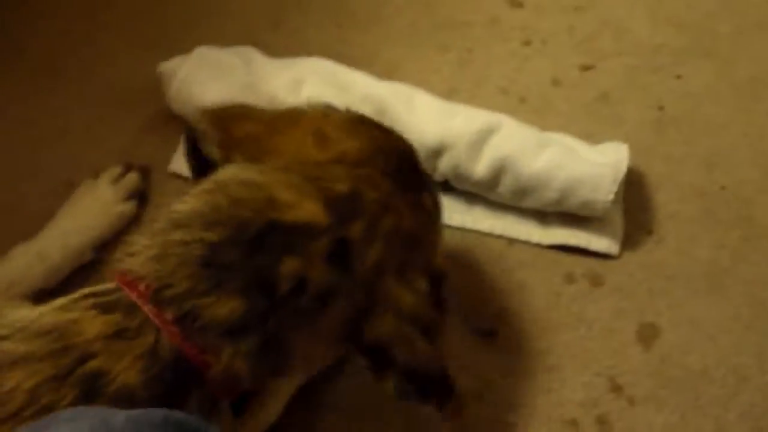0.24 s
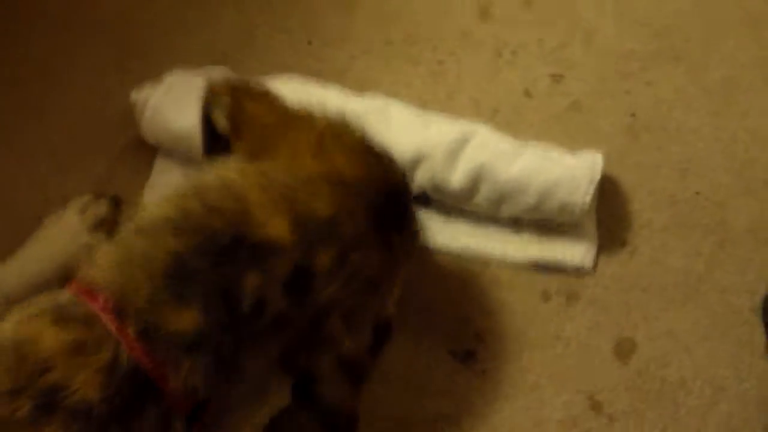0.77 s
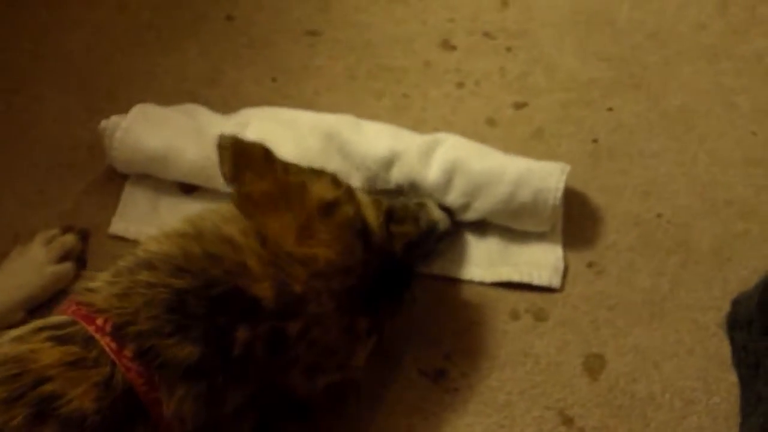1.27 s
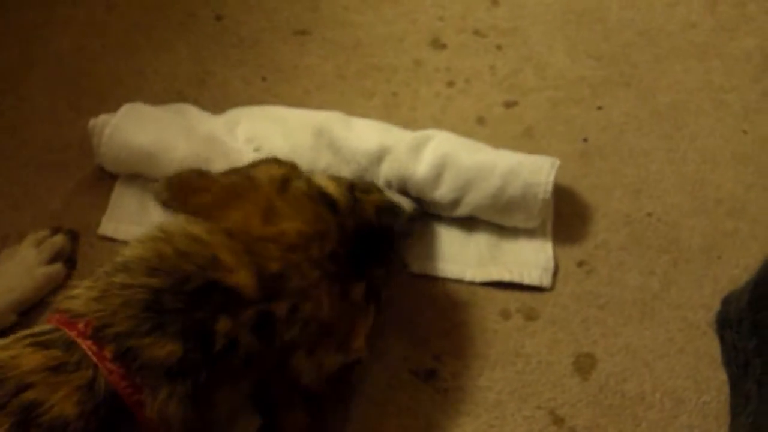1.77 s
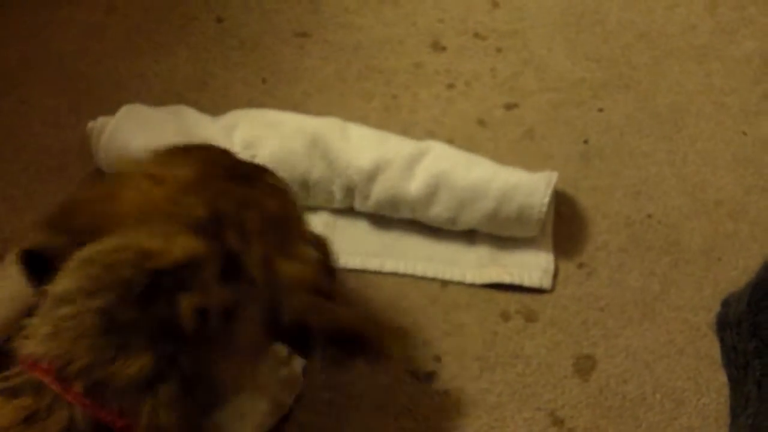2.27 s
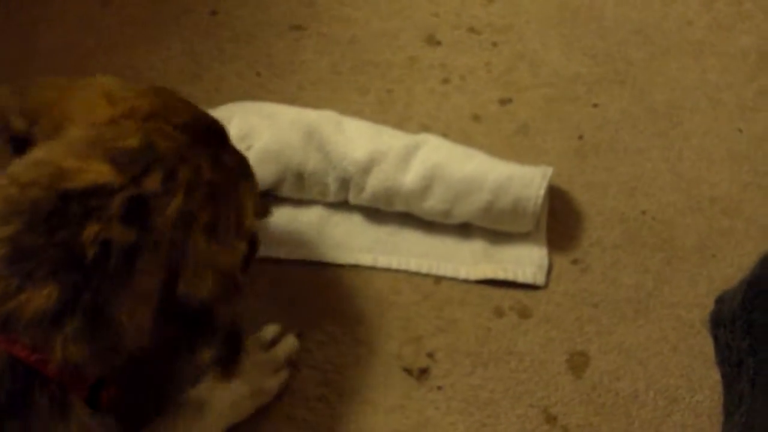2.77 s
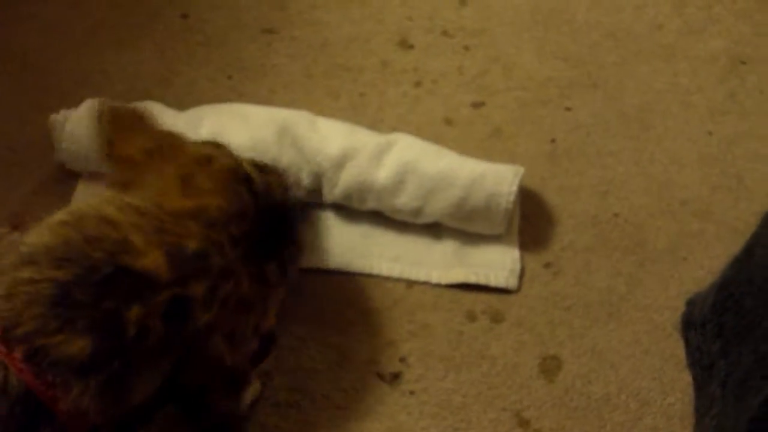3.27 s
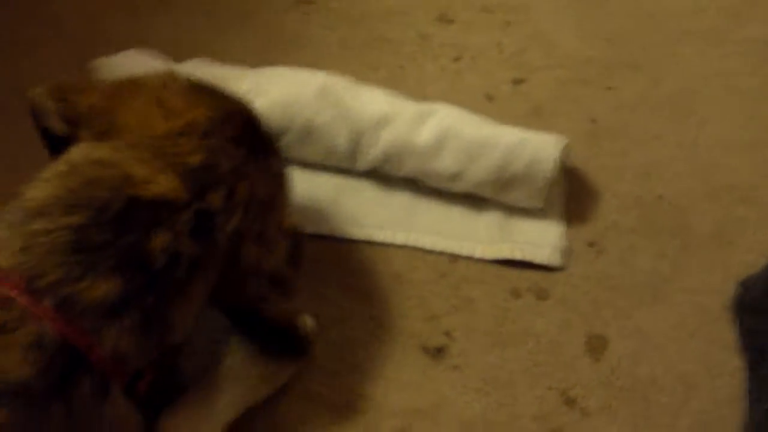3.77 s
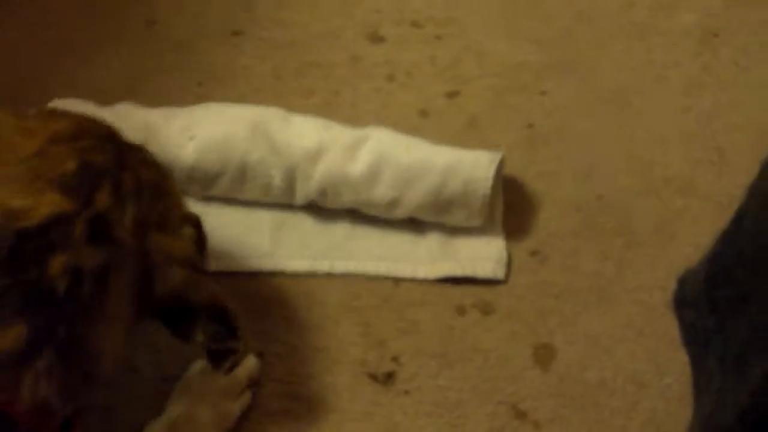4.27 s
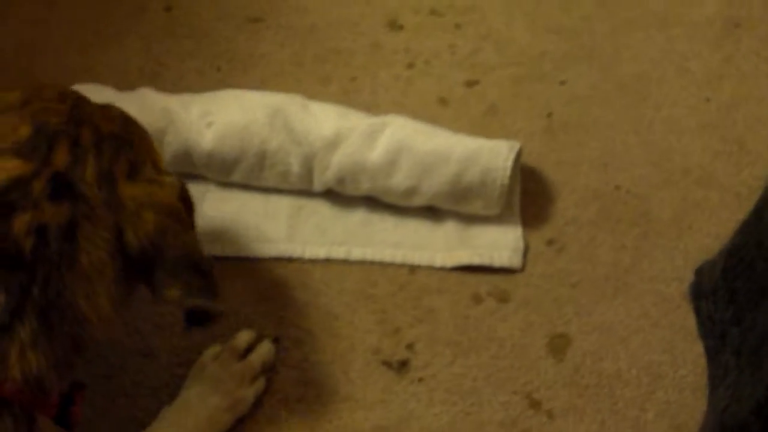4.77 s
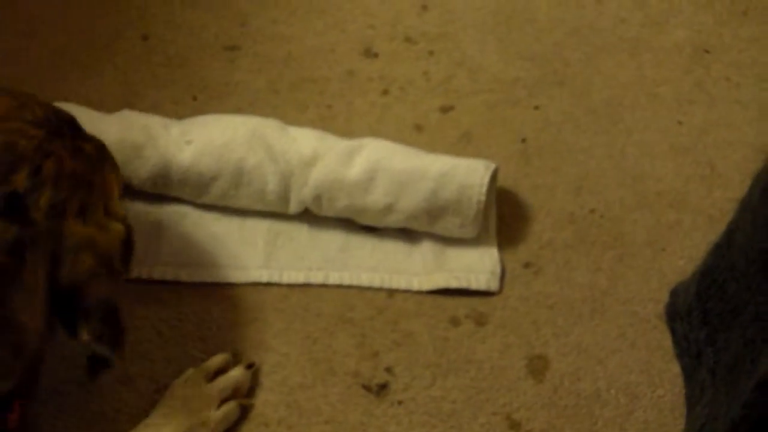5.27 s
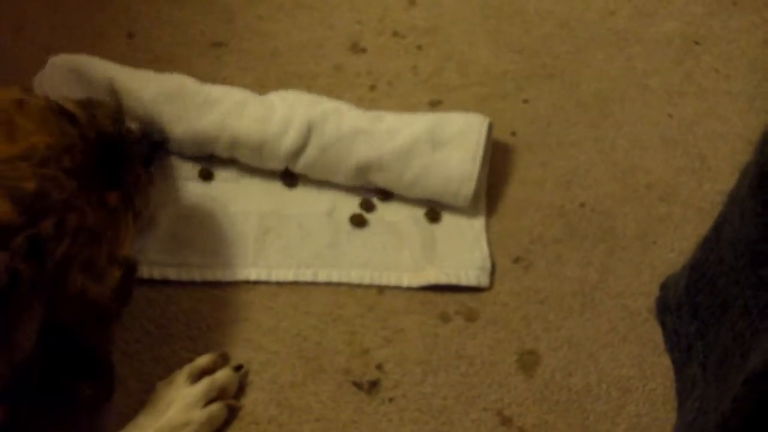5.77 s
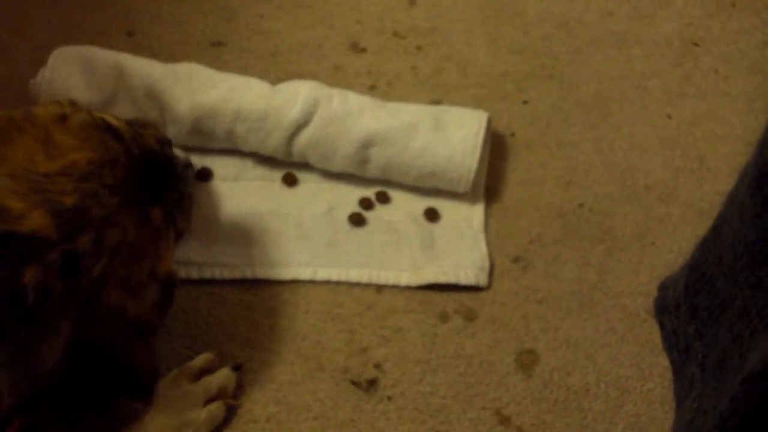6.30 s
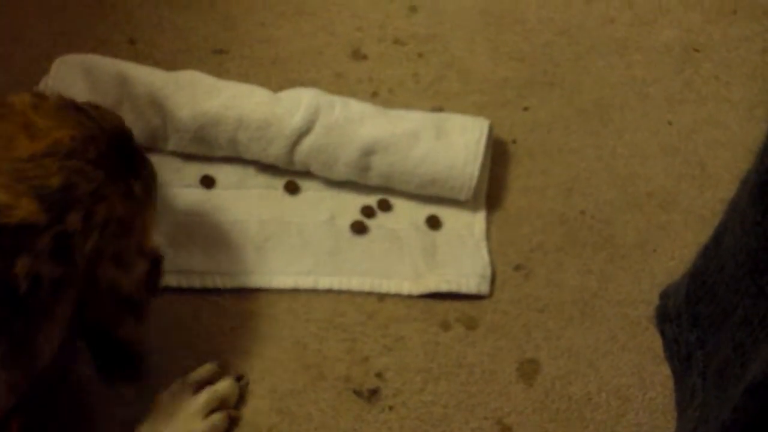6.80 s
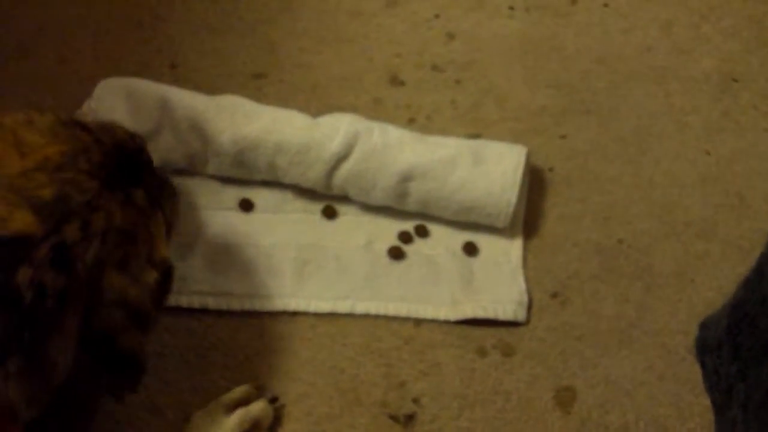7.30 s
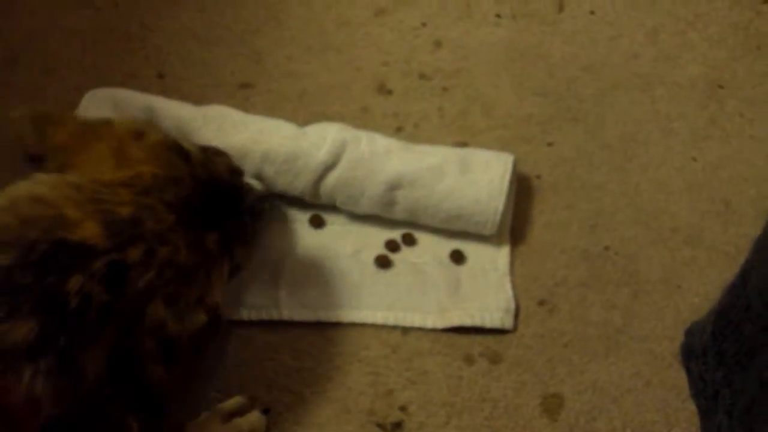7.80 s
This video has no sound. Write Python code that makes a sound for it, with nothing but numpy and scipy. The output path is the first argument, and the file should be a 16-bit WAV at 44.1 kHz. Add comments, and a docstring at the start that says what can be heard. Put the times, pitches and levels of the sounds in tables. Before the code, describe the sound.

A dog noses a rolled towel on carpet, crunching kibble as its collar tags tinkle faintly, while a sharp training clicker snaps twice in a quiet room.

```python
"""Cloth swishes close by over room hum and camera hiss, then a dog noses kibble from a rolled towel on carpet.
It crunches in clumps of tiny cracks that ring mouth and jaw; its collar tags tinkle faintly throughout.
A steel training clicker creaks, snaps in and springs back near 1.7 s, and again near 5.6 s.
Each time the hand-held camera overloads: its gain ducks, holds and recovers. A soft footfall ends the scene.
"""
import sys
import numpy as np
from scipy import signal
from scipy.fft import rfft, irfft, next_fast_len
from scipy.io import wavfile
from scipy.ndimage import minimum_filter1d, map_coordinates

SR = 44100
rng = np.random.default_rng(int(sys.argv[2]) if len(sys.argv) > 2 else 0)


def master(y):
    """Save y as 16-bit WAV."""
    cut = np.clip(np.atleast_2d(y).T, -1, 1)
    pcm = np.round(cut * 32767)  # scale
    wavfile.write(sys.argv[1], SR, pcm.astype(np.int16))


N = 355005
T_S = np.arange(N) / SR
AGE_S = T_S[:SR // 3]  # time since a blow


def amp(db):
    """Decibels to gain."""
    return 10 ** (np.asarray(db) / 20)


def unit(x):
    """Scale to rms 1."""
    return x / np.sqrt(np.mean(x ** 2) + 1e-20)


def along(points, hz):
    """(Hz, value) points interpolated on a log frequency axis."""
    f, v = np.transpose(points)
    return np.interp(np.log(hz + 1), np.log(f), v)


def filtered(x, response):
    """Multiply the spectrum of x by a response of frequency."""
    m = next_fast_len(len(x) + SR // 4)
    spectrum = rfft(x, m) * response(np.fft.rfftfreq(m, 1 / SR))
    return irfft(spectrum, m)[:len(x)]


def noise(spectrum, size=N):
    """Coloured noise of rms 1."""
    white = rng.standard_normal(size)
    return unit(filtered(white, lambda hz: amp(along(spectrum, hz))))


def wobble(rate_hz, size=N):
    """Smooth random curve with rate_hz knots a second."""
    knots = rng.standard_normal(int(size * rate_hz / SR) + 4)
    return map_coordinates(knots, [np.arange(size) * rate_hz / SR])


def fade(t60_s, attack_s):
    """Envelope of a blow: exponential attack and decay."""
    decay = 1000 ** (-AGE_S / max(abs(t60_s), 1e-4))
    return decay * (1 - np.exp(-AGE_S / max(attack_s, 1e-6)))


def ring(hz, t60_s, attack_s):
    """One struck mode: a decaying sine of random phase."""
    return np.sin(2 * np.pi * (hz * AGE_S + rng.random())) * fade(t60_s, attack_s)


def add(track, s, sound):
    """Mix a sound in at time s."""
    part = track[max(round(s * SR), 0):][:len(sound)]
    part += sound[:len(part)]


def scattered(count):
    """Chance events spread over the scene: rows of (s, two normal draws)."""
    draws = rng.standard_normal((count, 2))
    times_s = (np.arange(count) + rng.random(count)) * N / SR / count
    return np.column_stack([times_s, draws])


FALL_OVER_RISE = 1.25


def stroke(s, db, rise_s, t_s):
    """Envelope of a stroke that swells and dies away a little slower."""
    width_s = np.where(t_s < s, rise_s, rise_s * FALL_OVER_RISE)
    return amp(db) * np.exp(-abs((t_s - s) / width_s) ** 1.5)


# Camera swinging round after the dog [peak t/s, level/dB, rise/s]
CAMERA_SWINGS = [(0.22, -30.5, 0.2), (4.3, -40.5, 0.32)]
SWAY_DB, SWAY_WANDER_DB = -45, 2


def hand():
    """Camera motion: a wandering sway plus two swings."""
    sway = amp(SWAY_DB + SWAY_WANDER_DB * wobble(2))
    return sway + sum(stroke(*row, T_S) for row in CAMERA_SWINGS)


# Room rumble and camera hiss spectrum [f/Hz, relative level/dB]
FLOOR_SPECTRUM = [(25, -12.5), (55, 1.5), (85, -6), (150, -9.5), (190, -12), (290, -10), (420, -20.5),
                  (700, -19.5), (1600, -24.5), (3000, -26.5), (6500, -29), (8500, -27), (10500, -31.5),
                  (16000, -32)]
# Room hum [f/Hz, mean rms level/dB]
HUM_TONES = [(119.5, -60)]
HISS_TOP_HZ = 15800


def background():
    """Rumble and hiss, a narrow-band whistle, wavering hum and low-frequency hand sway."""
    hiss = amp(-53.0) * noise(FLOOR_SPECTRUM)
    white = rng.standard_normal(N)
    whistle = amp(-72.5) * unit(filtered(white, lambda hz: 1 / (1 + ((hz - 8580) / 90) ** 2)))
    hum = np.zeros(N)
    for hz, db in HUM_TONES:
        level = amp(db + 1.5 * wobble(4.8)) * np.sqrt(2)
        hum += level * np.sin(2 * np.pi * hz * T_S + 1.5 * wobble(5))
    sway = hand() * noise([(4, -4.5), (12, -3.5), (25, -18), (50, -24.0), (90, -38), (200, -66.5),
                           (1000, -110)])
    return filtered(hiss + whistle + hum + sway, lambda hz: hz < HISS_TOP_HZ)


def thud():
    """Soft footfall: a knock, a slow floor mode and low noise."""
    out = np.zeros(N)
    add(out, 7.92, amp(-29) * ring(266, 0.02, attack_s=0.00096))
    add(out, 7.93, amp(-21.5) * ring(50.5, 0.35, attack_s=0.018))
    rumble = noise([(50, 7.5), (90, 2.0), (150, -1.5), (320, -17), (800, -28.5), (5000, -36.5),
                    (16000, -41.5)], size=len(AGE_S))
    add(out, 7.932, amp(-24) * rumble * fade(0.19, attack_s=0.0074))
    return out


SWISH_HOLD_SHARE = 0.17  # time at full speed over slide length
SWISH_RISE_DB_PER_S, SWISH_SAG_DB_PER_S = 719, 218.5
SWISH_STOP_DB = 54  # extra loss over one more slide length


def swish(s, db, slide_s):
    """Swish envelope: gathers speed, holds, slows from time s, then stops."""
    early_s = np.maximum(s - SWISH_HOLD_SHARE * slide_s - T_S, 0)
    late_s = np.maximum(T_S - s, 0)
    stop_db = SWISH_STOP_DB * np.maximum(late_s / slide_s - 1, 0)
    return amp(db - SWISH_RISE_DB_PER_S * early_s - SWISH_SAG_DB_PER_S * late_s - stop_db)


# Cloth on cloth [t/s of slowing, level/dB, slide/s]
CLOTH_SWISHES = [(0.131, -23, 0.024), (0.263, -27.5, 0.087)]
# Weave noise [f/Hz, relative level/dB]
WEAVE_SPECTRUM = [(240, -35), (400, -16.5), (893, -17.5), (1130, -21.5), (1870, -20), (2220, -12),
                  (3020, -12.5), (3470, -4.5), (4240, -7.5), (5190, 3), (5780, -14.5), (6440, -11.5),
                  (7170, -17.5), (9610, -11), (16000, -50.5)]
# Swish resonances [f/Hz, half-amplitude width/Hz, relative level/dB]
WEAVE_PEAKS = [(900, 78, -8.5), (2250, 74, -10.5), (2830, 76, -6), (3435, 160, -0.5), (3593, 70, 0.5),
               (3870, 70, -0.5), (4650, 90, 2), (4880, 62, -4), (5180, 110, 3.5), (6270, 100, -3)]
# Collar dragging over fur [peak t/s, level/dB, rise/s]
COLLAR_DRAGS = [(2.463, -43, 0.011), (2.561, -40, 0.0055), (2.777, -38, 0.01), (3.5, -60.5, 0.2),
                (4.16, -61, 0.076), (7.254, -52.5, 0.071), (7.6, -46.5, 0.012)]
# Fur friction noise [f/Hz, relative level/dB]
FUR_SPECTRUM = [(600, -6), (2000, -7.5), (3200, -4), (5000, 1), (6500, -6.5), (8300, 5.5), (9500, -4.5),
                (11000, -12.5), (16000, -21)]
# Muzzle pushing through the towel [peak t/s, level/dB, rise/s, centre f/Hz]
MUZZLE_PUSHES = [(0.48, -55, 0.056, 1990), (0.726, -48, 0.027, 1420), (1.02, -44.5, .033, 1500),
                 (2.215, -49.5, 0.018, 1080), (2.48, -50, 0.065, 1060), (2.785, -43, .04, 1120),
                 (3.47, -56, 0.062, 1200), (4.617, -51.5, 0.035, 1250), (4.913, -42.5, 0.011, 1290),
                 (5.085, -51.5, 0.077, 1300), (5.55, -54, 0.034, 1200), (6.721, -56.5, 0.077, 910),
                 (7.61, -51.5, 0.086, 990)]
# Towel friction noise [multiple of centre f, relative level/dB]
TOWEL_SPECTRUM = [(.1, -25.5), (.25, 2), (.5, -8), (.85, 0), (1.2, -4), (1.6, -10), (2.1, -12.5), (3, -18),
                  (7, -24.5), (13, -31.5)]
BITE_RUB_DB, BITE_RUB_RISE_S, BITE_RUB_HZ = -31, 0.03, 1200  # level re crack


def weave_response(f):
    """Sum of the cloth's resonance peaks."""
    return sum(amp(db) / (1 + (2 * (f - hz) / width) ** 2) for hz, width, db in WEAVE_PEAKS)


def cloth():
    """Threads and hairs catch and slip, roughening each stroke; every bite also rubs the towel."""
    resonant = unit(filtered(rng.standard_normal(N), weave_response))
    weave = noise(WEAVE_SPECTRUM) + amp(-2.5) * resonant
    rough_weave = unit(weave * amp(2.1 * wobble(700)))
    out = sum(swish(*row) for row in CLOTH_SWISHES) * rough_weave
    rough_fur = unit(noise(FUR_SPECTRUM) * amp(2.9 * wobble(500)))
    out += sum(stroke(*row, T_S) for row in COLLAR_DRAGS) * rough_fur
    bite_rubs = [(s, crack_db + BITE_RUB_DB, BITE_RUB_RISE_S, BITE_RUB_HZ)
                 for s, crack_db, *_ in KIBBLE_BITES]
    for s, db, rise_s, centre_hz in MUZZLE_PUSHES + bite_rubs:
        start_s = max(s - 0.5, 0)
        colour = [(centre_hz * k, level) for k, level in TOWEL_SPECTRUM]
        catches = amp(4.5 * np.tanh(wobble(220, size=SR)))
        rub = unit(noise(colour, size=SR) * catches)
        add(out, start_s, rub * stroke(s, db, rise_s, start_s + T_S[:SR]))
    return out


# Clearest tag touches [t/s, low mode/dB, high mode/dB, freedom to ring 0-1]
TAG_JINGLES = [(0.022, -41.5, -49.5, 1), (0.161, -48.5, -65, 1), (0.416, -40, -52, 0.02),
               (0.429, -38, -51, 0.02), (2.417, -62, -48, 0.4), (3.2, -70, -45.5, 0.13),
               (3.829, -52, -44, 0.25), (5.043, -51.5, -50, 0.47), (5.34, -53, -60, .5),
               (5.945, -55.5, -67, 1)]
# Metal tag modes [f/Hz, t60/s when free]
TAG_MODES = [(8107, 0.6), (9367, 0.32)]
GRAZE_LOW_DB, GRAZE_HIGH_DB, GRAZE_SPREAD_DB, GRAZE_FREEDOM = -64, -59.5, 3.5, 0.4


def tags():
    """Two metal modes, balanced by where the tag is touched, damped where it lies on fur; random grazes."""
    out = np.zeros(N)
    grazes = [(s, GRAZE_LOW_DB + GRAZE_SPREAD_DB * a, GRAZE_HIGH_DB + GRAZE_SPREAD_DB * b, GRAZE_FREEDOM)
              for s, a, b in scattered(count=26)]
    for s, low_db, high_db, freedom in TAG_JINGLES + grazes:
        for db, (hz, t60_s) in zip([low_db, high_db], TAG_MODES):
            add(out, s, amp(db) * ring(hz, t60_s * freedom, attack_s=0.0011))
    return out


# Clearest ticks of teeth, lips and crumbs [t/s, level/dB, centre f/Hz]
MOUTH_TICKS = [(0.0217, -36.5, 6500), (0.6632, -38.5, 1920), (0.6815, -41, 6000), (0.7714, -30, 1530),
               (0.9554, -38.5, 5170), (1.6424, -35, 1110), (2.4761, -32, 1130), (2.5048, -32, 970),
               (2.5574, -33.5, 1060), (3.5046, -34.5, 1400), (4.5418, -40, 3120), (4.5629, -24.5, 2800),
               (4.8774, -37, 1240), (6.6094, -38, 2820), (6.7265, -32.5, 7040), (6.8085, -37.5, 1550),
               (7.512, -34.5, 3250), (7.8059, -36.5, 9250)]
TICK_T60_S = 0.017
CRUMB_DB, CRUMB_SPREAD_DB, CRUMB_HZ, CRUMB_SPREAD_OCTAVES = -46.5, 0.5, 2400, 0.6


def ticks():
    """Short broad noise bursts about their own pitch, plus fainter random crumbs."""
    out = np.zeros(N)
    crumbs = [(s, CRUMB_DB + CRUMB_SPREAD_DB * a, CRUMB_HZ * 2 ** (CRUMB_SPREAD_OCTAVES * b))
              for s, a, b in scattered(count=12)]
    for s, db, hz in MOUTH_TICKS + crumbs:
        colour = [(hz / 9, -16), (hz / 2.3, -4), (hz, 0), (hz * 2.0, -7), (hz * 4, -20)]
        burst = noise(colour, size=len(AGE_S))
        add(out, s, amp(db) * burst * fade(TICK_T60_S, attack_s=0.0005))
    return out


# Bites [t/s, crack level/dB, jaw level/dB, mouth f/Hz, crumbling t60/s]
KIBBLE_BITES = [(0.85, -23, -36, 770, 0.029), (0.8775, -22, -37, 820, 0.058),
                (1.1059, -34.5, -31, 756, 0.053), (2.533, -33.5, -38.5, 850, .024),
                (2.5822, -26.5, -30.5, 1054, 0.0205), (2.6211, -26.5, -46, 1177, 0.026),
                (2.819, -40, -36.5, 935, 0.071), (2.836, -28, -26, 994, 0.045),
                (4.9465, -44, -35, 990, 0.036), (4.9814, -22, -22, 833, 0.026),
                (6.532, -35.5, -67, 730, 0.016), (7.594, -37.5, -48, 1090, .025),
                (7.6451, -37, -36.5, 945, 0.02), (7.678, -24.5, -33, 895, .055)]
# Fracture noise [f/Hz, relative level/dB]
KIBBLE_SPECTRUM = [(80, -13), (250, 16.5), (600, 3.5), (1700, 5.5), (2800, -1), (4300, -2.5), (6500, -9.5),
                   (9000, -4), (12000, -25), (16000, -30)]
# Jaw modes [mean f/Hz, relative level/dB, t60/s]
JAW_MODES = [(291, -2, 0.071), (303, -4, 0.082), (406, -14, 0.07)]
# a wider mouth rings higher and lets out more of the crack
MOUTH_HZ, MOUTH_DB, OPEN_DB_PER_OCTAVE = 888, 4, 25


def bites():
    """Kibble fractures in a clump of tiny cracks; mouth cavity and jaw ring with it."""
    out = np.zeros(N)
    size = len(AGE_S)
    for s, crack_db, jaw_db, mouth_hz, t60_s in KIBBLE_BITES:
        clumping = amp(7 * np.tanh(wobble(1400, size=size)))
        grains = unit(noise(KIBBLE_SPECTRUM, size=size) * clumping)
        add(out, s, amp(crack_db) * grains * fade(t60_s, attack_s=0.0007))
        cavity = ring(mouth_hz, 0.022, attack_s=0.001)
        cavity += amp(-8) * ring(mouth_hz * 1.185, 0.019, attack_s=0.0018)
        cavity += amp(-11.5) * ring(mouth_hz * 2.43, 0.0093, attack_s=0.0004)
        opening_db = OPEN_DB_PER_OCTAVE * np.log2(mouth_hz / MOUTH_HZ)
        add(out, s, amp(crack_db + MOUTH_DB + opening_db) * cavity)
        for hz, db, jaw_t60_s in JAW_MODES:
            tone = np.sin(2 * np.pi * hz * rng.normal(1, 0.013) * AGE_S)
            add(out, s, amp(jaw_db + db) * tone * fade(jaw_t60_s, attack_s=0.00059))
    return out


def snap(spectrum):
    """A dense, even, short crack of steel on plastic."""
    decay = fade(0.009, attack_s=0.00005)
    burst = rfft(rng.standard_normal(len(AGE_S)) * decay)
    colour = amp(along(spectrum, np.fft.rfftfreq(len(AGE_S), 1 / SR)))
    # each crack keeps the given colour; only its phases are random
    crack = irfft(colour * np.exp(1j * np.angle(burst)), len(AGE_S))
    crack = crack * fade(0.046, attack_s=0.00005)
    return crack * np.linalg.norm(decay) / np.linalg.norm(crack)


# Steel leaf modes [f/Hz, relative level/dB, t60/s]
LEAF_MODES = [(3680, -18, 0.0063), (4220, -7, .008), (5740, 0, 0.0062), (7820, 1.5, 0.0084),
              (8780, -14, 0.0051), (9240, -7.5, 0.0081), (14500, -13.5, .006), (16500, -19.5, 0.0049)]
AIR_LEAD_S = 0.00021  # air pulse ahead of the crack


def snaps(rows, spectrum, push_db, leaf_db, rebound_db, rebound_s, tail_db, tail_t60_s):
    """Leaf buckles, pushes out air, restrikes its case; the floor echoes, the room hisses on."""
    out = np.zeros(N)
    for s, db in rows:
        add(out, s, amp(db) * snap(spectrum))
        add(out, s + rebound_s, amp(db + rebound_db) * snap(spectrum))
        for hz, level, t60_s in LEAF_MODES:
            add(out, s, amp(db + leaf_db + level) * ring(hz, t60_s, attack_s=0.00005))
        add(out, s - AIR_LEAD_S, -amp(db + push_db) * fade(0.00095, attack_s=0.00004))
        add(out, s + 0.017, amp(db - 22.5) * snap(spectrum))  # floor echo
        tail = noise(spectrum, size=len(AGE_S)) * fade(tail_t60_s, attack_s=0.0017)
        add(out, s, amp(db + tail_db) * tail)
    return out


# Leaf snapping in [t/s, level/dB]
LEAF_PRESSES = [(1.6919, -1.5), (5.6487, -1.5)]
# Press crack [f/Hz, relative level/dB]
PRESS_SPECTRUM = [(400, -24), (2600, -16), (4000, -7.5), (6500, -4), (8500, 1.5), (10000, 1.5),
                  (11500, -12), (14000, -5), (16000, -10)]
# Leaf springing back [t/s, level/dB]
LEAF_RELEASES = [(1.9004, -1), (5.8340, -2)]
# Release crack [f/Hz, relative level/dB]
RELEASE_SPECTRUM = [(400, -47), (1000, -8.5), (2400, -5.5), (3400, 1), (4400, 0.5), (5500, -3.5), (7700, 1),
                    (9200, -2.5), (11000, -7.5), (16000, -19.5)]
# Case creaking under the thumb [t/s, level/dB before CREAK_GAIN_DB]
CASE_CREAKS = [(1.5376, -28.5), (1.544, -36), (1.5962, -23.5), (1.672, -22.5), (5.524, -36.5)]
CREAK_GAIN_DB = 0.5


def clicker():
    """Small case creaks, a hard click on pressing, a duller one on release."""
    out = snaps(LEAF_PRESSES, PRESS_SPECTRUM, push_db=4.5, leaf_db=-3.0, rebound_db=-9.0,
                rebound_s=0.0012, tail_db=-17.5, tail_t60_s=0.15)
    out += snaps(LEAF_RELEASES, RELEASE_SPECTRUM, push_db=-34.5, leaf_db=-4.5, rebound_db=-3,
                 rebound_s=0.0011, tail_db=-27, tail_t60_s=0.15)
    for s, db in CASE_CREAKS:
        creak = snap([(800, -36), (3000, -8.5), (8500, 1.5), (11000, -6), (16000, -17.5)])
        add(out, s, amp(db + CREAK_GAIN_DB) * creak)
    return out


# Carpeted room decay [f/Hz, t60/s]
ROOM_DECAY = [(200, 0.26), (2000, 0.13), (9000, 0.065), (15000, 0.026)]


def room(x, tail_db, echo_db):
    """Carpeted room: one hard reflection and a short diffuse tail."""
    hz, t_s, bins = signal.stft(rng.standard_normal(len(AGE_S)), SR, nperseg=256)
    decay = 1000 ** (-t_s / along(ROOM_DECAY, hz)[:, None])
    tail = signal.istft(bins * decay, SR, nperseg=256)[1]
    answer = amp(tail_db) * tail / np.linalg.norm(tail)
    add(answer, 0.0155, amp([echo_db]))
    return x + signal.fftconvolve(x, answer)[:N]


def scene():
    """Clicker close to the microphone, dog down on the floor with room reflections."""
    dog = room(bites() + ticks(), tail_db=-10.5, echo_db=-16.5)
    return (background() + thud() + cloth() + tags() + dog + clicker())[None]


def gain_control(x, threshold_db, depth_db, hold_s, recovery_db_per_s, attack_s):
    """Peaks pull the gain down; it holds, then recovers at constant dB/s."""
    over_db = np.clip(20 * np.log10(abs(x) + 1e-9) - threshold_db, 0, depth_db)
    size = 2 * int(hold_s * SR / 2) + 1
    held_db = -minimum_filter1d(-over_db, size, origin=size // 2)
    ramp_db = recovery_db_per_s * T_S
    cut_db = np.maximum.accumulate(held_db + ramp_db) - ramp_db
    pole = np.exp(-1 / (attack_s * SR))
    return x * amp(-signal.lfilter([1 - pole], [1, -pole], cut_db))


TOP_HZ = 16500


def record(dry):
    """Camera gain control, full-scale clipping and band limit."""
    x = gain_control(dry[0], threshold_db=-10.0, depth_db=10.5, hold_s=0.16,
                     recovery_db_per_s=37.5, attack_s=0.0055)
    return filtered(np.clip(x, -1, 1), lambda hz: hz < TOP_HZ)[None]


dry = scene()
out = record(dry)
master(out)
```